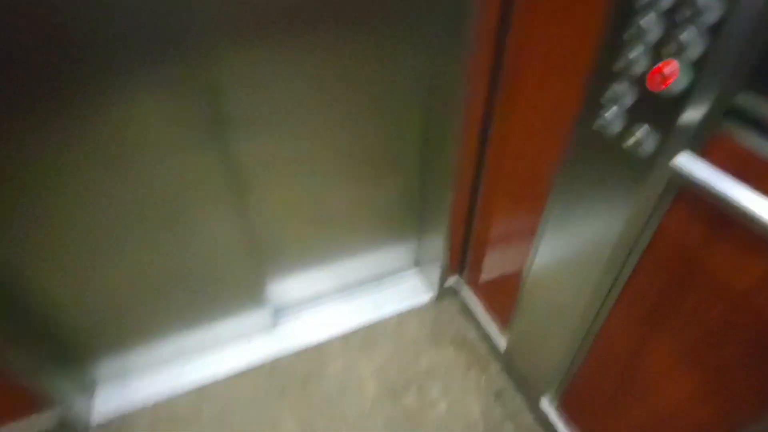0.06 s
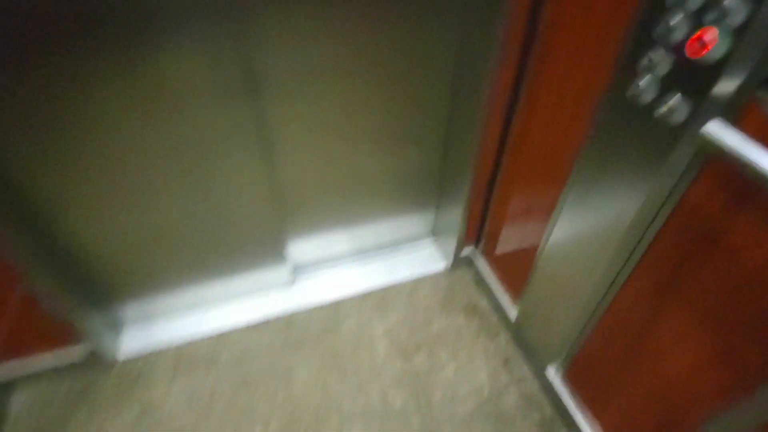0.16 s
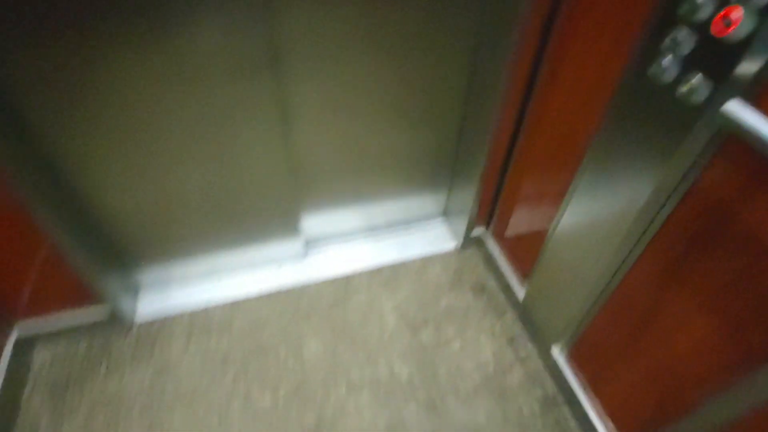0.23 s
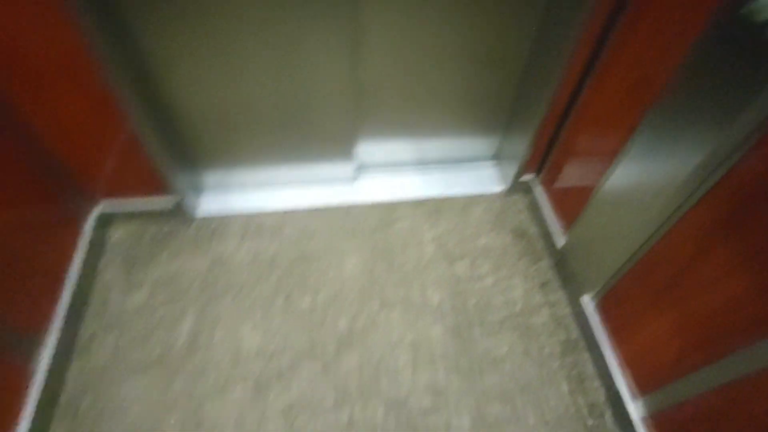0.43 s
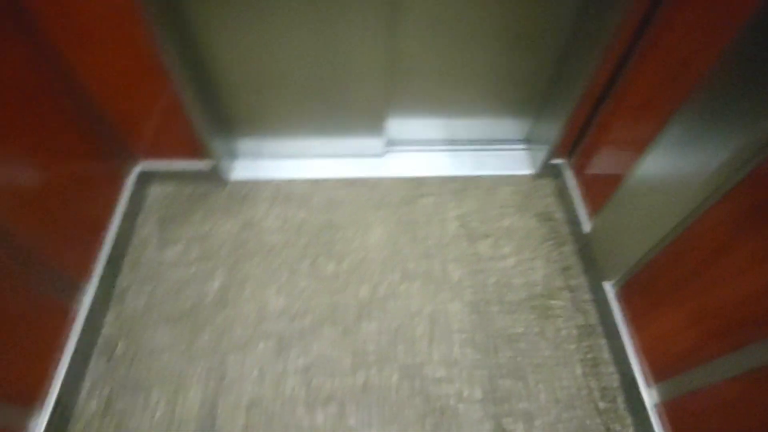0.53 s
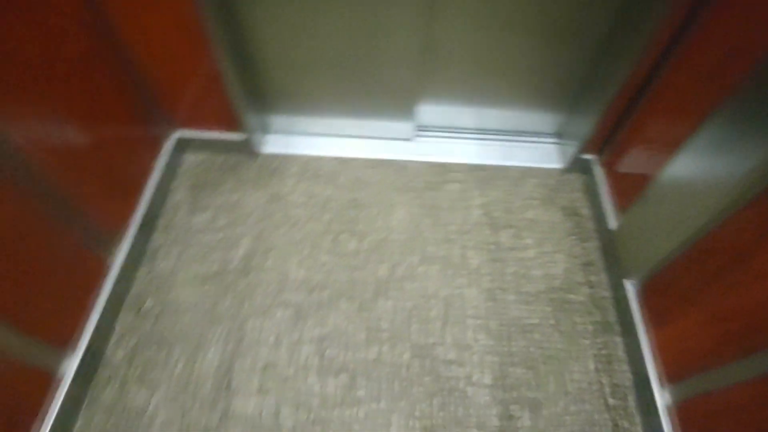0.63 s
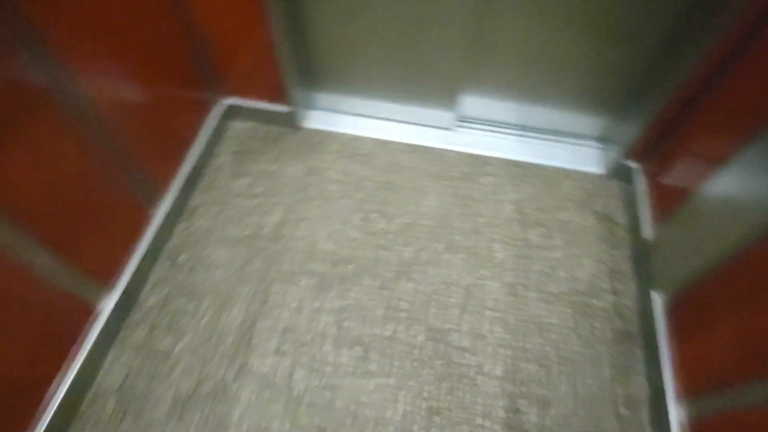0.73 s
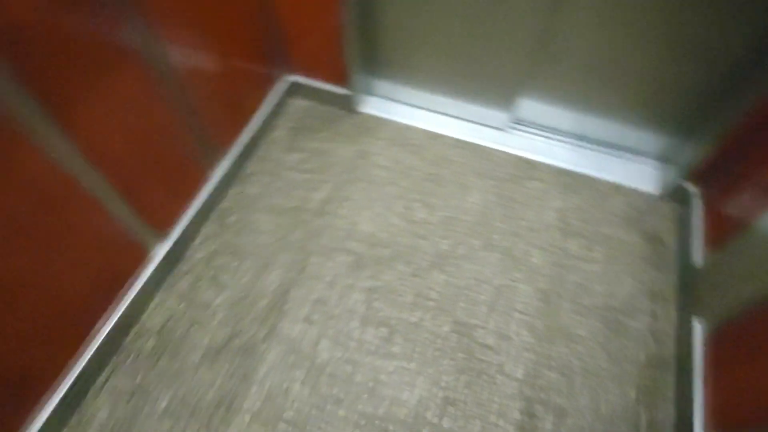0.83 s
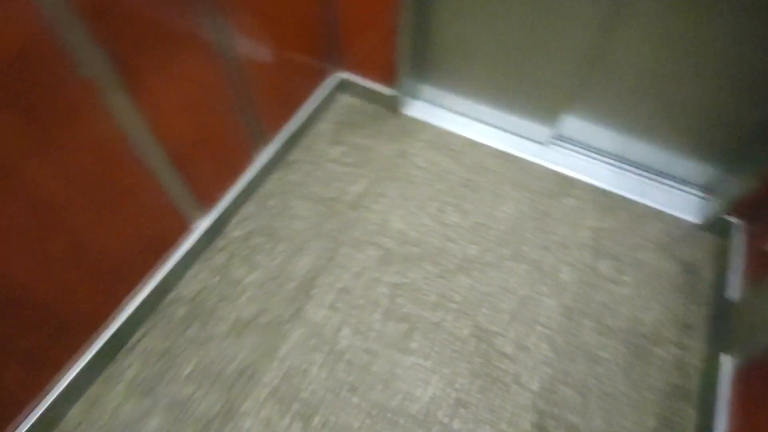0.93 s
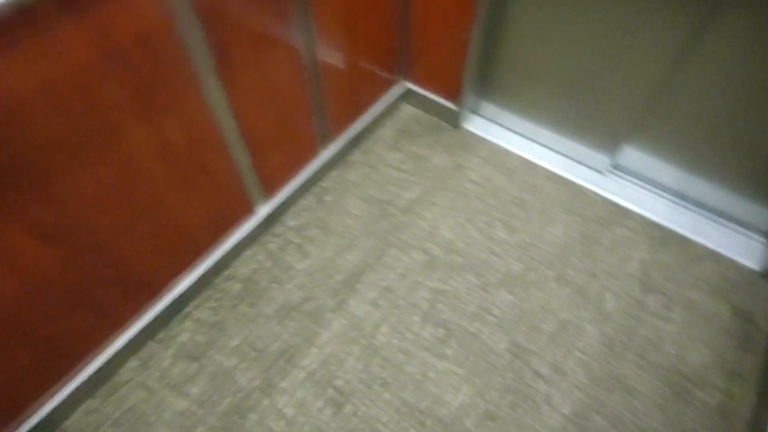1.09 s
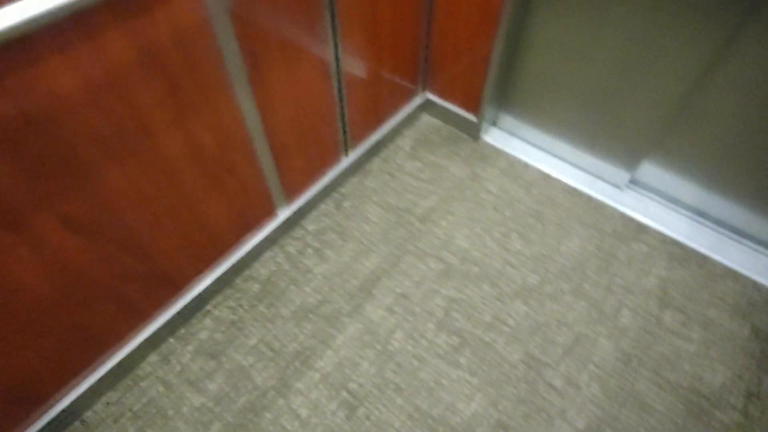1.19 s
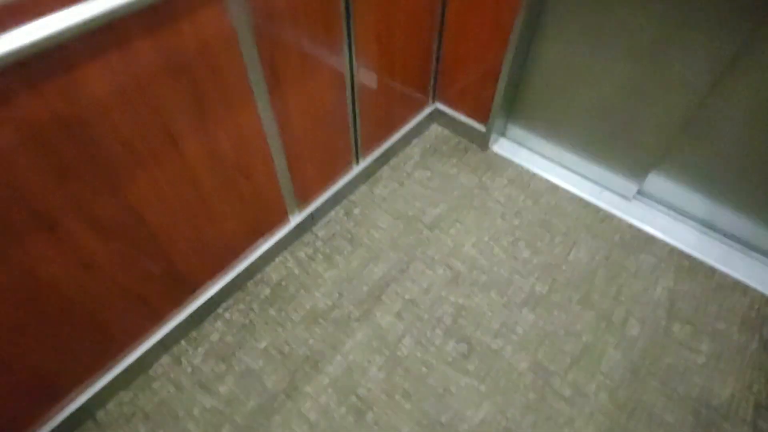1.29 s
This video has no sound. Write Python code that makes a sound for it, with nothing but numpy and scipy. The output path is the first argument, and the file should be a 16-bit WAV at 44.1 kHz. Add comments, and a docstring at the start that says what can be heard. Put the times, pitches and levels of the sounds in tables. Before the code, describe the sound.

A small mechanism clicks twice, clacks and knocks softly inside a quietly humming elevator.

```python
"""A small mechanism clicks twice, clacks and settles with a dull knock inside a humming elevator cabin.
It sits against the right microphone, probably in the hand-held casing, so it sounds dry and one-sided.
Each impact is a force pulse filtered by the casing's resonances: the shorter, the brighter.
Faint friction noise runs through the same casing, over the cabin's drone, rumble and moving air."""
import sys
import numpy as np
from scipy import signal
from scipy.fft import rfft, irfft
from scipy.io import wavfile

SR = 44100
rng = np.random.default_rng(int(sys.argv[2]) if len(sys.argv) > 2 else 0)


def master_out(mix):
    """Clip the mix to full scale and print it as 16-bit PCM to the path in sys.argv[1]."""
    frames = np.transpose(np.atleast_2d(mix))
    ceiling = np.clip(frames, -1, 1)
    pcm = np.round(ceiling * 32767).astype(np.int16)
    wavfile.write(sys.argv[1], SR, pcm)


N = 59535
T = np.arange(N) / SR

# hard contacts on the casing: time_s, level_db, width_ms, ping_db, snap_db, snap_top_hz
HARD_CONTACTS = [ (0.2394, -6.5, 0.18, -7.5, -8, 14800), (0.3959, -1.5, .14, -1.1, -3.5, 8570),
                 (0.4673, -3, .17, 0, -29, 7000), (0.4748, -3.5, 0.1, 2.5, -36, 6000),
                 (0.4774, -8.5, 0.14, -3, -25, 11060), ]
# soft knocks as the parts shift and settle: time_s, level_db, width_ms
SOFT_KNOCKS = [(0.3638, -31, 0.99), (0.371, -30, 1.2), (0.382, -30.5, 1.3), (0.4063, -30, 1),
               (0.4221, -41, 0.69), (0.429, -36, 0.44), (0.5544, -22, 0.67), (0.5598, -26, 0.6)]
# resonances and dips of the casing: centre_hz, gain_db, q
CASING_RESPONSE = [(150, 2, 2), (617, 5.5, 2.1), (885, -6, 5.4), (1210, 7, 4.53), (1736, -5, 4.2),
                   (2220, 11, 1.26), (2870, 3.5, 4), (3440, -2.5, 2.7)]
def clacks():
    """Impact excitation: force pulses are coloured by the heavily damped resonances of the casing."""
    force = sum(force_pulse(s, db, width_ms) for s, db, width_ms in SOFT_KNOCKS)
    for s, db, width_ms, ping_db, _, _ in HARD_CONTACTS:
        force += peak_filter(force_pulse(s, db, width_ms), hz=2450, db=ping_db, q=0.81)
    for hz, db, q in CASING_RESPONSE:
        force = peak_filter(force, hz, db, q)
    thinned = butterworth(force, hz=106, kind="high")
    return butterworth(thinned, hz=64, kind="high", order=2)


def snaps(delay_s=0.00023, band_hz=(4670, 7870)):
    """Release transients: each hard contact lets go with a bright, band-limited impulse."""
    clicks = 0
    for s, _, _, _, snap_db, top_hz in HARD_CONTACTS:
        impulse = from_db(snap_db) * (np.arange(N) == int((s + delay_s) * SR))
        clicks += butterworth(impulse, top_hz, "low", order=2)
    return butterworth(clicks, band_hz, "band")


# metal modes left ringing by the clack: pitch_hz, level_db, t60_s
METAL_MODES = [(1906, -53, 0.98), (2040, -58, .9), (285, -49.5, 0.39)]
def ring(start_s=0.4747):
    """Free vibration: each mode rings on faintly as an exponentially damped sinusoid."""
    return sum(decay(start_s, db, t60) * np.sin(2 * np.pi * hz * (T - start_s))
               for hz, db, t60 in METAL_MODES)


# strength of the rubbing: time_s, level_db
RUB_LEVEL = [(0, -54), (.09, -58), (.15, -64), (.24, -49.5), (.33, -60.5), (.45, -56), (.55, -53.5),
             (.68, -55.5), (.775, -53.5), (.8, -62.5), (.95, -66.5), (1.02, -66.5), (1.13, -64), (1.2, -70),
             (1.35, -72.5)]
# friction spectrum: frequency_hz, density_db
RUB_SPECTRUM = [(200, -2.5), (500, 0.5), (850, -4), (1200, 0.5), (1650, -1), (2100, 3.5), (2700, -3),
                (3500, -12.5), (5000, -36.5), (8000, -52), (16000, -61)]
# squeaks of the rubbing: peak_s, spread_s, pitch_hz, level_db
RUB_SQUEAKS = [ (.84, .022, 2200, -65), (.941, .005, 2130, -59), (.942, .005, 2600, -64),
               (1.134, .014, 2250, -60), (1.133, .009, 3290, -66.5), ]
def rubbing():
    """Sliding friction: broadband noise on the casing, now and then catching in a narrowband squeak."""
    squeaks = sum(swell(s, spread_s, db) * noise(resonance(hz, half_width_hz=110))[0]
                  for s, spread_s, hz, db in RUB_SQUEAKS)
    return level(RUB_LEVEL)[0] * noise(spectrum(RUB_SPECTRUM))[0] + squeaks


# tiny ticks within the rubbing: start_s, level_db, t60_s
RUB_TICKS = [ (.2275, -55, .006), (.651, -65, .012), ]
# tick spectrum: frequency_hz, density_db
TICK_SPECTRUM = [(1500, -20), (3500, 10), (6000, 3.5), (15000, -6.5), (17000, -20)]
def ticks():
    """Noise transients: a sudden onset and a decay of milliseconds are heard as a tick."""
    return sum(decay(*row) for row in RUB_TICKS) * noise(spectrum(TICK_SPECTRUM))[0]


# brighter moments of the rubbing: peak_s, spread_s, level_db
RUB_SCUFFS = [(0.738, 0.035, -72), (1.071, 0.0096, -71)]
# scuff spectrum: frequency_hz, density_db
SCUFF_SPECTRUM = [(500, -9), (1500, 6), (4500, 5), (8000, -10), (12000, -10), (17000, -25)]
def scuffs():
    """Friction bursts: bright noise swells and fades on both sides."""
    return sum(swell(*row) for row in RUB_SCUFFS) * noise(spectrum(SCUFF_SPECTRUM))


# spectrum of a light brush: frequency_hz, density_db
BRUSH_SPECTRUM = [(3000, -32), (6500, -7), (8500, -3), (15000, -6), (17000, -22.5)]
def brush():
    """Exponential decay of treble noise: one short, very light hiss."""
    return decay(start_s=0.065, db=-64.5, t60_s=0.127) * noise(spectrum(BRUSH_SPECTRUM))[0]


# tones of the machinery: pitch_hz, level_db
MACHINE_TONES = [(64.6, -72.5), (144.5, -67), (276, -70.5)]
def hum(waver_db=2.5, waver_hz=7):
    """Amplitude modulation: each low machine tone wavers slowly and randomly in level."""
    tones = 0
    for hz, db in MACHINE_TONES:
        waver = noise(resonance(0, waver_hz))[0]
        amplitude = np.sqrt(2) * from_db(db + waver_db * waver)
        tones += amplitude * np.sin(2 * np.pi * (hz * T + rng.random()))
    return tones


# resonances of the cabin drone: centre_hz, half_width_hz, level_db
DRONE_BANDS = [(64, 42, -66), (139.5, 15, -66), (231.4, 14, -72.5), (282.2, 10, -67.5), (316.6, 30, -73),
               (397, 54, -72.5), (647, 35, -77)]
# rise and fall of drone and hum together: time_s, gain_db
DRONE_GAIN = [(0, -1.5), (.2, -1.5), (.31, 0), (.45, 1), (.64, 3.5), (.8, -4.5), (.92, -0.5), (1.1, 1.5),
              (1.35, 1)]
def drone():
    """Resonance: noise confined to narrow bands takes on pitch and blends with the machine hum."""
    bands = sum(from_db(db) * noise(resonance(hz, half_width_hz), correlation=0.92)
                for hz, half_width_hz, db in DRONE_BANDS)
    return level(DRONE_GAIN) * (bands + hum())


# strength of the rumble: time_s, left_db, right_db
RUMBLE_LEVEL = [(0, -45.5, -45), (.05, -56, -50.5), (.19, -54.5, -52), (.25, -78, -55.5), (.42, -59, -46),
                (.62, -70, -52), (.75, -76, -57.5), (.85, -70.5, -64.5), (1.35, -68.5, -76)]
# rumble spectrum: frequency_hz, density_db
RUMBLE_SPECTRUM = [(25, -15.5), (55, -15.5), (85, 1.5), (145, 0.5), (200, -13.5), (330, -24.5),
                   (600, -26.5), (1500, -64.5)]
def rumble():
    """Coherent low noise: long waves reach both sides nearly in phase."""
    return level(RUMBLE_LEVEL) * noise(spectrum(RUMBLE_SPECTRUM), correlation=0.86)


# strength of the air noise: time_s, level_db
AIR_LEVEL = [(0, -64.5), (.13, -65), (.24, -59.5), (.33, -66), (.6, -64.5), (.75, -63), (.83, -67),
             (1.02, -67), (1.07, -61.5), (1.2, -68.5), (1.35, -69.5)]
# air spectrum: frequency_hz, density_db
AIR_SPECTRUM = [(20, 9), (60, 6.5), (200, -4), (330, -6.5), (500, -1.5), (900, -5), (1400, -9.5),
                (2200, -12.5), (4000, -19.5), (7000, -28), (16000, -34)]
def air():
    """Diffuse noise: moving air in the cabin is only weakly correlated between the sides."""
    return level(AIR_LEVEL) * noise(spectrum(AIR_SPECTRUM), correlation=0.23)


def force_pulse(time_s, db, width_ms):
    """One smooth pulse of contact force; the narrower, the wider its spectrum."""
    return -from_db(db) / np.cosh(np.clip((T - time_s) * 1000 / width_ms, -30, 30))


def decay(start_s, db, t60_s):
    """Exponential envelope that starts at once and falls 60 dB in t60_s."""
    return from_db(db) * (T > start_s) * np.exp(-np.log(1000) * np.abs(T - start_s) / t60_s)


def swell(peak_s, spread_s, db):
    """Gaussian envelope."""
    return from_db(db) * np.exp(-.5 * ((T - peak_s) / spread_s) ** 2)


def from_db(db):
    """Decibels to amplitude ratio."""
    return 10 ** (np.asarray(db) / 20)


def level(rows):
    """Gain over time, interpolated along each decibel column."""
    times_s, *columns = np.transpose(rows)
    return from_db([np.interp(T, times_s, db) for db in columns])


def spectrum(points):
    """Spectral envelope, interpolated over log frequency."""
    hz, db = np.transpose(points)
    return lambda f: from_db(np.interp(np.log(f), np.log(hz), db))


def resonance(hz, half_width_hz):
    """Lorentzian gain curve around a centre frequency."""
    return lambda f: 1 / (1 + ((f - hz) / half_width_hz) ** 2)


def noise(gain_at, correlation=0):
    """Spectrally shaped stereo noise of rms 1; the mid-side balance sets the correlation."""
    white = rfft(rng.standard_normal((2, N)))
    mid, side = irfft(white * gain_at(np.fft.rfftfreq(N, 1 / SR) + 1), N)
    pair = np.sqrt(1 + correlation) * mid + np.sqrt(1 - correlation) * side * np.array([[1], [-1]])
    return pair / pair.std(axis=1, keepdims=True)


def peak_filter(x, hz, db, q):
    """Second-order resonant peak or dip."""
    w, a = 2 * np.pi * hz / SR, np.sqrt(from_db(db))
    k = np.sin(w) / (2 * q)
    numerator = [1 + k * a, -2 * np.cos(w), 1 - k * a]
    denominator = [1 + k / a, -2 * np.cos(w), 1 - k / a]
    return signal.lfilter(numerator, denominator, x + 1e-18)


def butterworth(x, hz, kind, order=1):
    """Filter with a maximally flat passband."""
    return signal.sosfilt(signal.butter(order, hz, kind, fs=SR, output="sos"), x + 1e-18)


def scene(left_leak_db=-55):
    """Superposition: the casing on the right, a brush on the left, scuffs and cabin on both sides."""
    casing = clacks() + snaps() + ring() + rubbing() + ticks()
    cabin = drone() + rumble() + air()
    left = from_db(left_leak_db) * casing + brush()
    return np.array([left, casing]) + scuffs() + cabin


# microphone hiss and its spectrum: frequency_hz, density_db
HISS_DB, HISS_SPECTRUM = -84, [(100, -2), (6000, -0.5), (15500, 4.5), (16500, -9)]
def record(dry, cutoff_hz=16500):
    """Self-noise and band limiting: microphone hiss is added, then a steep low-pass cuts the top."""
    hiss = from_db(HISS_DB) * noise(spectrum(HISS_SPECTRUM))
    low_pass = signal.ellip(10, .1, 70, cutoff_hz, fs=SR, output="sos")
    return signal.sosfilt(low_pass, dry + hiss)


dry = scene()
out = record(dry)
master_out(out)
```